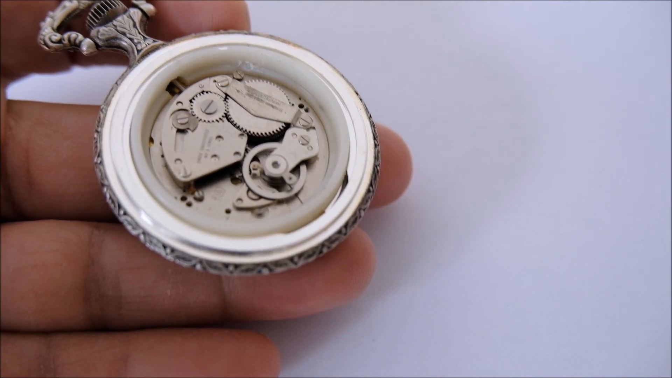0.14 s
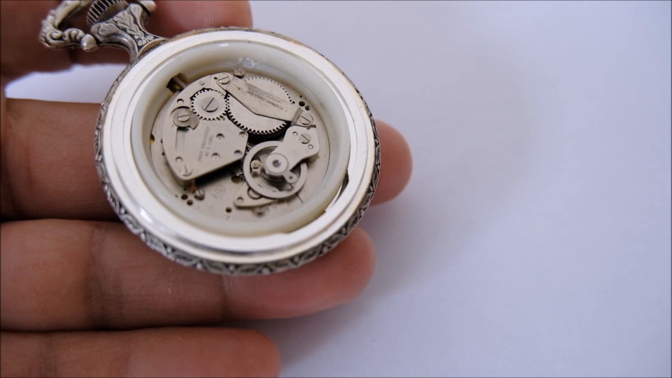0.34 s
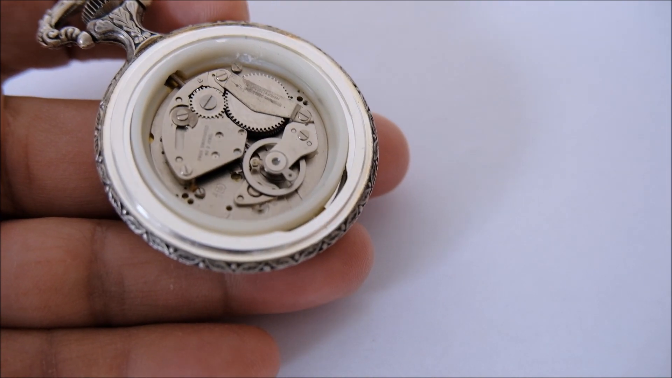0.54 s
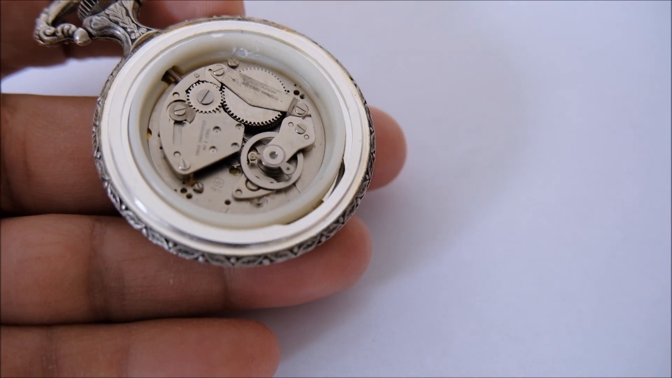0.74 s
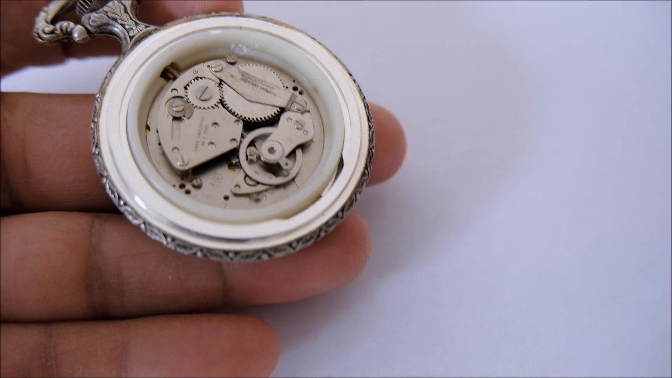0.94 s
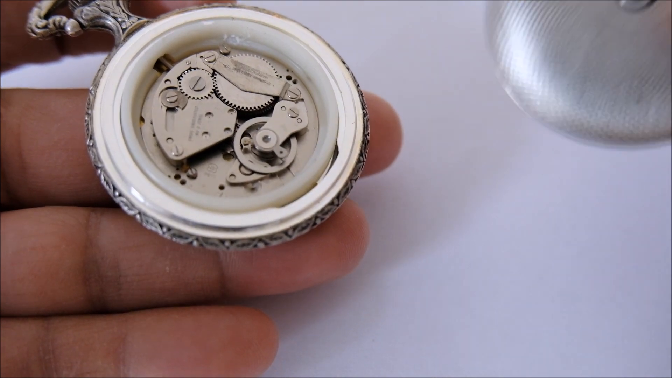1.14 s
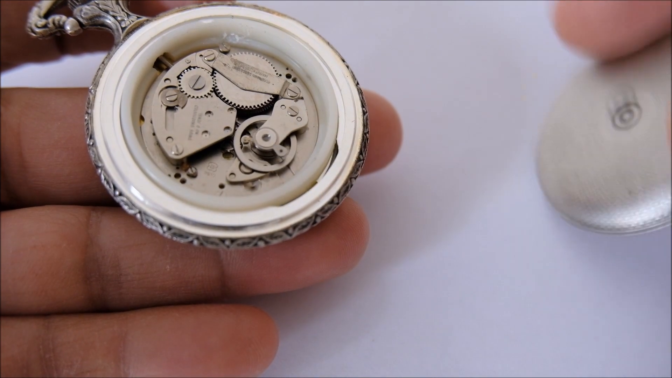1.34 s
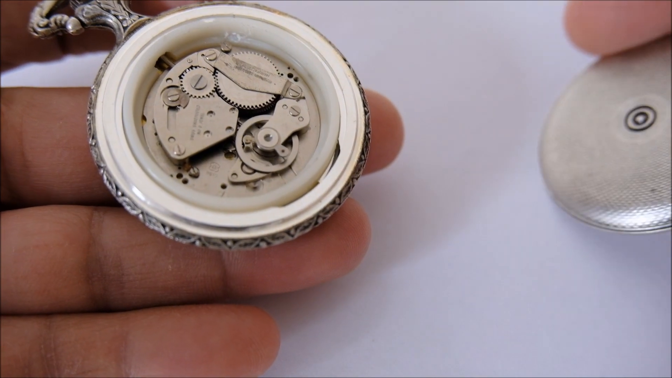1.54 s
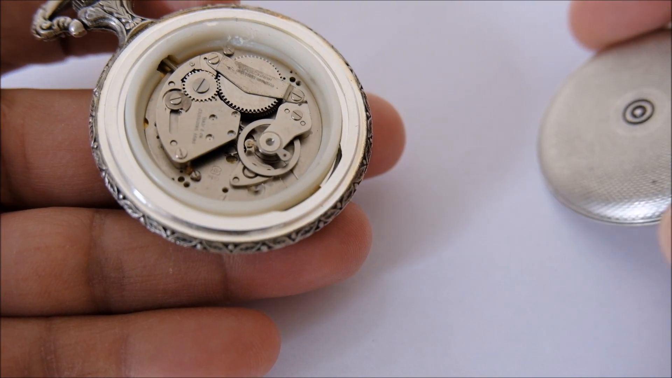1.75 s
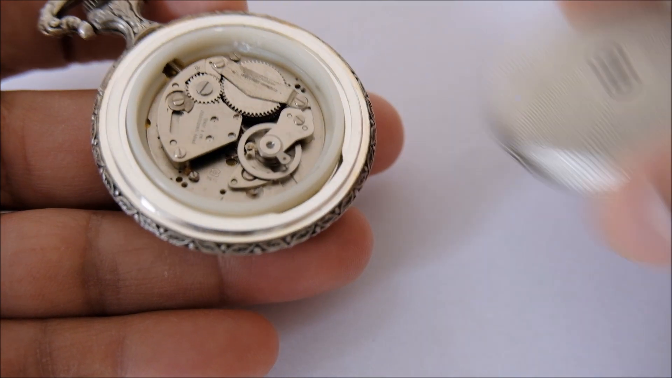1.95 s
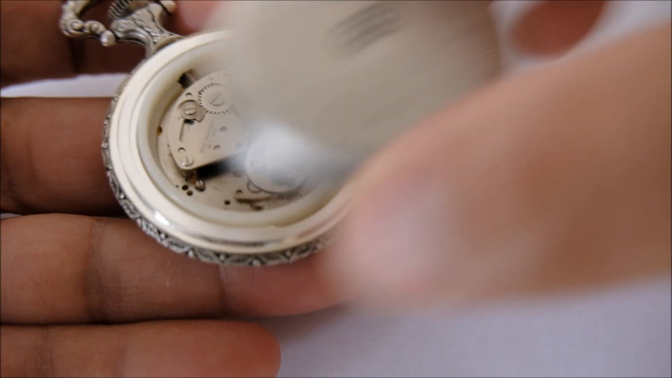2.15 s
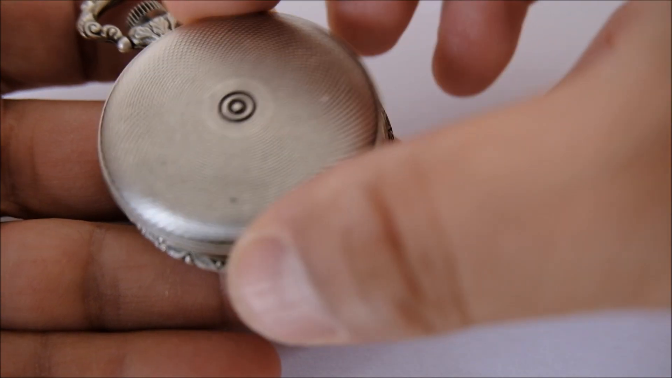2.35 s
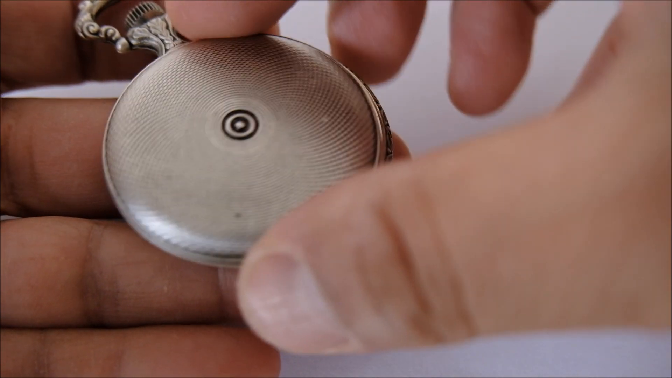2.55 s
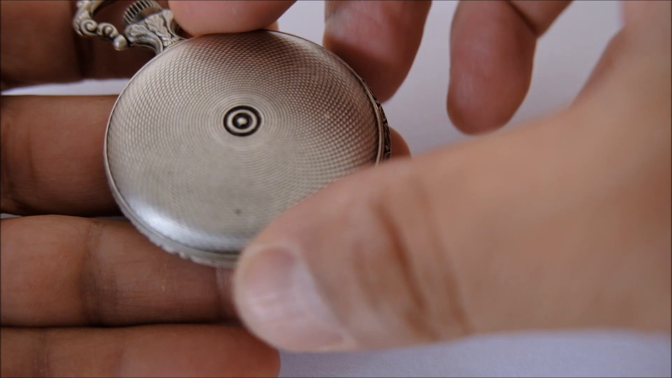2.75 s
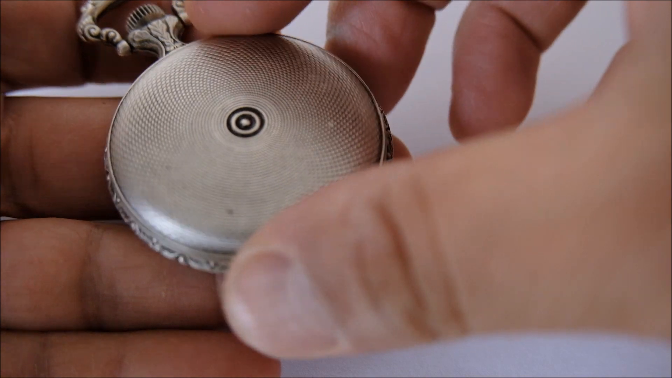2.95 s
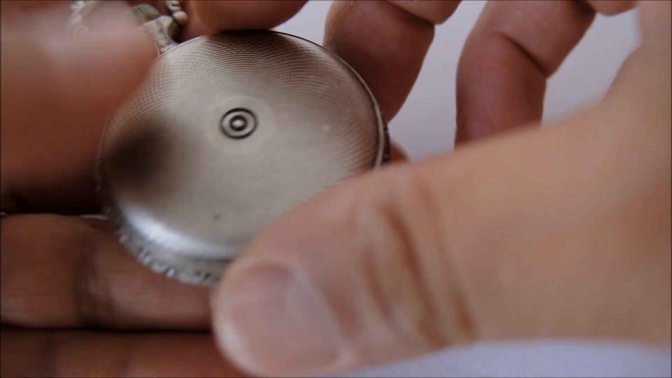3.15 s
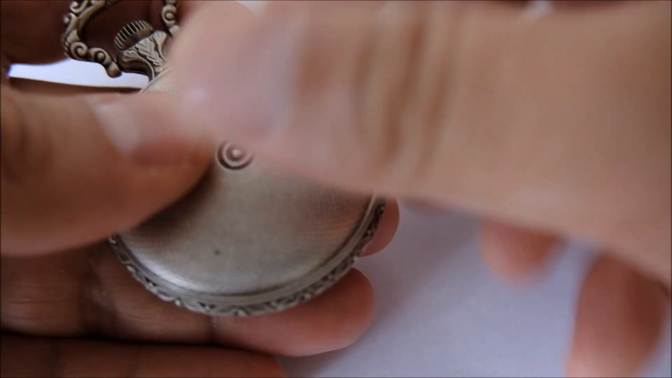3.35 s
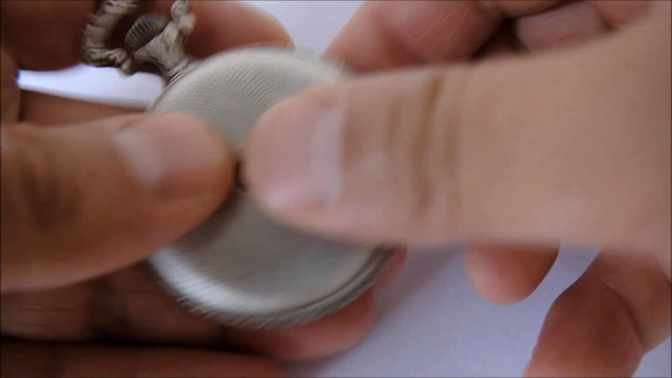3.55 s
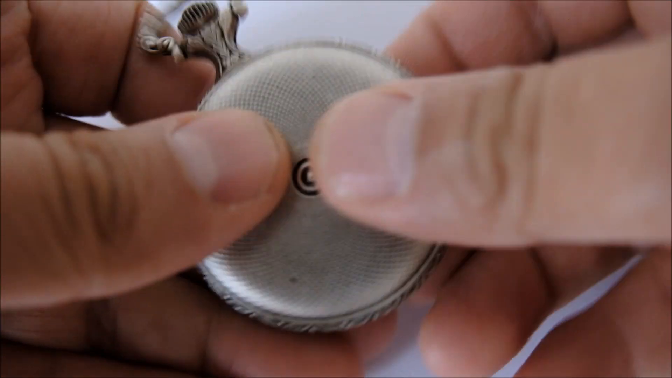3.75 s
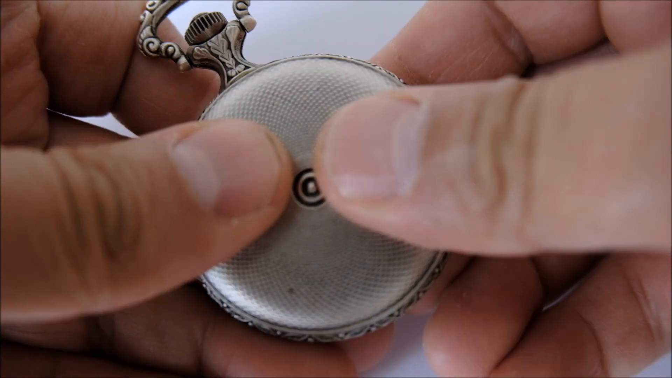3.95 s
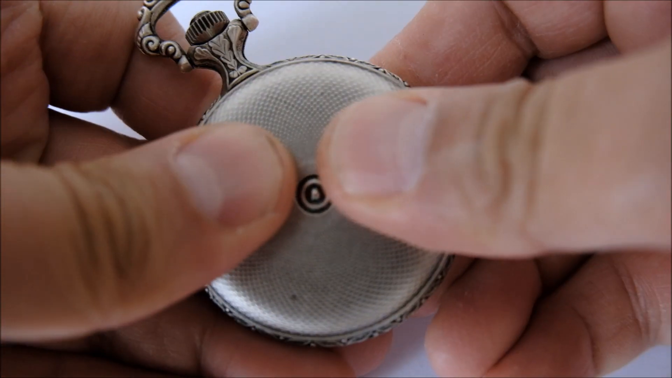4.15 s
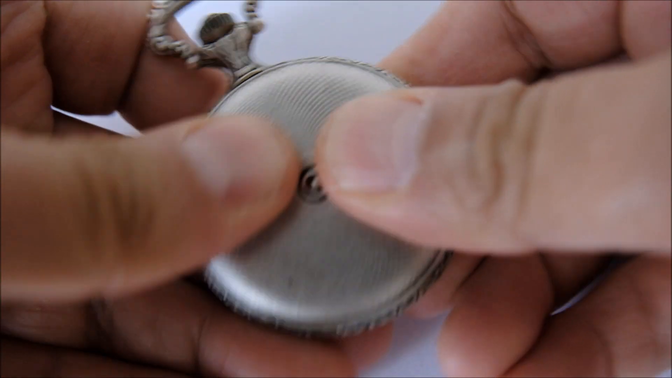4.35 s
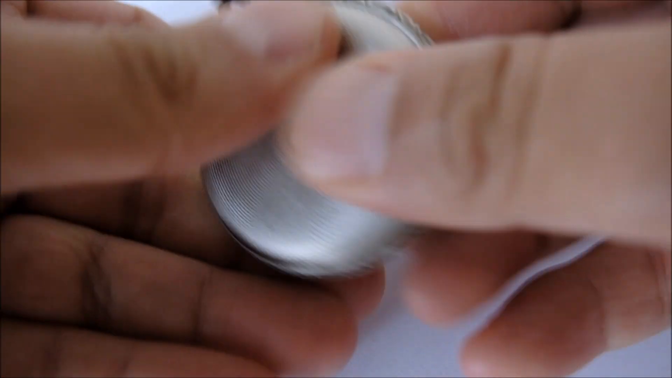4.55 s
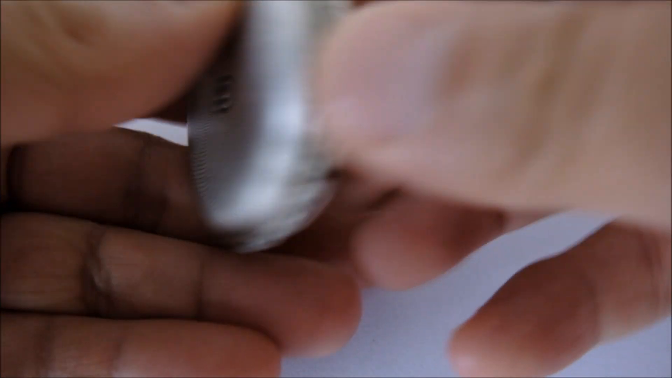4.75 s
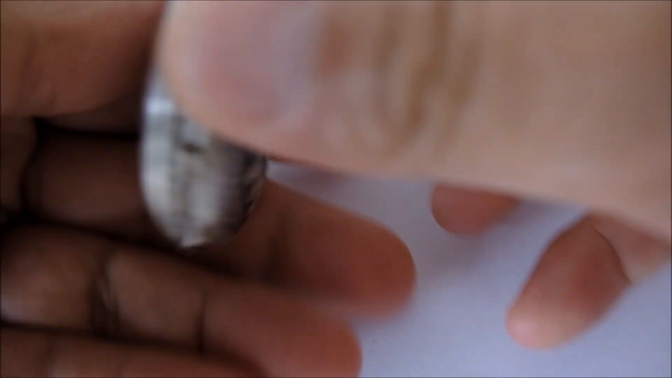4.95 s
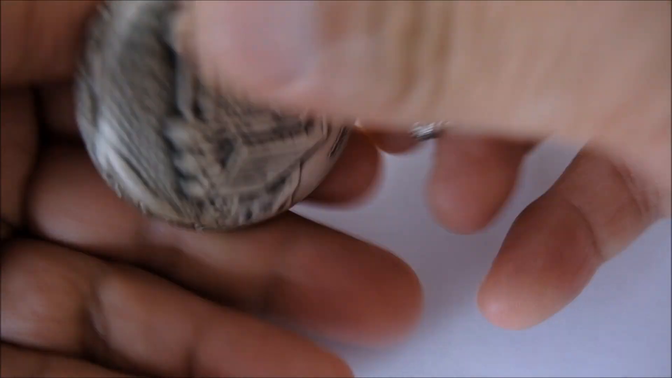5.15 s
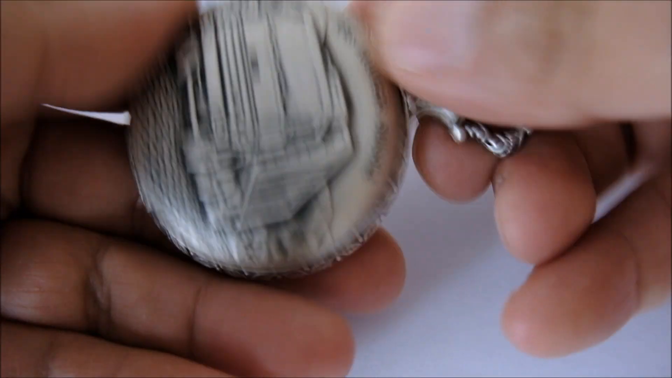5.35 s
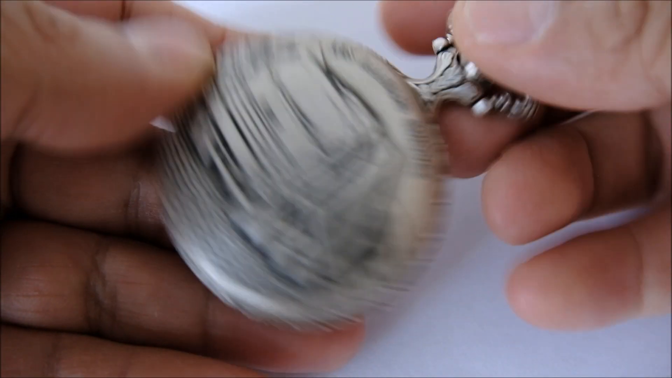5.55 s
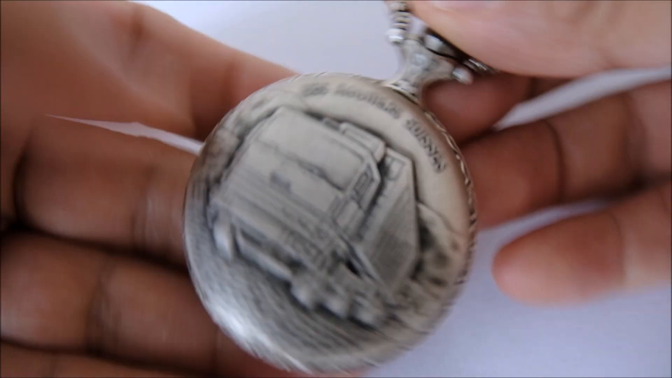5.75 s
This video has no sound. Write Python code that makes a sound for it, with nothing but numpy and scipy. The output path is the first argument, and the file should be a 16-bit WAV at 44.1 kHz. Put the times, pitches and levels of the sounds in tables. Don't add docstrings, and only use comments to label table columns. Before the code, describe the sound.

Close, small metallic ticks and skin rubs, a wooden knock, a bright lid clatter and one hard, dry snap over a faint machine drone.

```python
import sys
import numpy as np
from scipy import signal
from scipy.io import wavfile
from scipy.ndimage import uniform_filter1d

SR = 44100
rng = np.random.default_rng(int(sys.argv[2]) if len(sys.argv) > 2 else 0)


def unload_audio(sound):
    columns = np.transpose(np.atleast_2d(sound))
    steps = np.round(np.clip(columns, -1, 1) * 32767)
    wavfile.write(sys.argv[1], SR, steps.astype(np.int16))


def boost_factor(decibels):
    exponent = np.asarray(decibels, float) / 20
    return 10 ** exponent


N = 255912


def evened(x):
    return x / np.sqrt(np.mean(x ** 2) + 1e-20)


def read(points, hz):
    f, value = np.transpose(points)
    return np.interp(np.log(hz + 1), np.log(f + 1), value)


def add(mix, start_s, sound, pan_db=0., lag_samples=1):
    for port, side in enumerate((1, -1)):
        part = mix[port, round(start_s * SR) + port * lag_samples:][:len(sound)]
        part += sound[:len(part)] * boost_factor(side * pan_db / 2)


def ring(modes, contact_ms, spread_db=0., free=1.):
    t = np.arange(4500) / SR
    place_db = spread_db * rng.standard_normal(len(modes))
    tones = np.zeros(len(t))
    for (hz, db, t60_s), extra_db in zip(modes, place_db):
        fall_db = 60 * t / (t60_s * free)
        tones += boost_factor(db + extra_db - fall_db) * np.sin(2 * np.pi * hz * t)
    return tones * (1 - np.exp(-1000 * t / contact_ms))


def noise(level_db, same, size, patchy_db):
    frames, hz = 4 * N // size + 5, np.fft.rfftfreq(size, 1 / SR)
    a, b, c, d, patch = rng.standard_normal((frames, len(hz), 5)).T
    patch = uniform_filter1d(patch, size=12, axis=0)
    patch = evened(uniform_filter1d(patch, size=8, axis=1))
    likeness = np.clip(same(hz), -1, 1)[:, None]
    left = a + 1j * b
    right = likeness * left + np.sqrt(1 - likeness ** 2) * (c + 1j * d)
    z = np.array([left, right]) * boost_factor(level_db(hz)[:, None] + patchy_db * patch)
    return evened(signal.istft(z, nperseg=size, noverlap=3 * size // 4)[1][:, :N])


def strokes(rows, span_db=20.5):
    t = np.arange(0, N + 16, 16) / SR
    gain = np.zeros(len(t))
    for peak_s, db, swell_s, fade_s in rows:
        away = np.maximum((peak_s - t) / swell_s, (t - peak_s) / fade_s)
        gain += boost_factor(db - span_db * away)
    return np.interp(np.arange(N) / SR, t, gain)


def tick(db, hz, ms):
    t = np.arange(2400) / SR
    burst = rng.standard_normal(len(t)) * np.exp(-1000 * t / ms)
    peak = signal.iirpeak(hz, 1.8, fs=SR)
    tone = signal.lfilter(*peak, signal.lfilter(*peak, burst))
    band_hz = [0.5 * hz, min(2.2 * hz, SR / 2.5)]
    edge = signal.lfilter(*signal.butter(2, band_hz, "band", fs=SR), burst)
    sound = tone + 0.094 * edge
    return boost_factor(db) * sound / abs(sound).max()


# frequency in Hz, level in dB, t60 in s.
SHUT = [(281, -11, 0.0045), (633, -3, 0.0039), (1214, .3, 0.0036), (1600, -8, 0.004)]
# frequency in Hz, level in dB, t60 in s.
LIP = [(2300, -22, 0.006), (3250, -10, 0.0035), (4000, -5, .0032), (4600, -15, 0.007), (5250, -19, 0.007),
       (6200, -19, 0.004), (7800, -14, 0.003), (9350, -19, 0.004), (11200, -27, .003)]
CLIMB_S, CLIMB_DB = 4.0974, 2.2
RELEASE_S, RELEASE_DB = 4.0979, -.6


def snap():
    out = np.zeros((2, N))
    add(out, CLIMB_S, boost_factor(CLIMB_DB) * ring(SHUT, .35), .3)
    release = ring(SHUT, .15) + boost_factor(3.5) * ring(LIP, .06)
    add(out, RELEASE_S, -boost_factor(RELEASE_DB) * release, .3)
    return out


# frequency in Hz, level in dB, t60 in s.
LID = [(3000, -11.5, .04), (2922, -0.5, 0.056), (6180, -5.5, 0.05), (6296, 0.7, 0.069), (9800, -2.5, 0.05),
       (11460, -29.5, .03), (12600, -23, 0.0305), (14780, -24, 0.049)]
# frequency in Hz, level in dB, t60 in s.
CASE = [(1243, -6, 0.011), (1446, 4.5, 0.011), (2320, -13, .006), (3700, -3, 0.006), (4370, 1.1, 0.004),
        (5100, -5, 0.0038), (5510, -12.5, .003), (7830, -19, 0.00316)]
# start in s, crack in dB, lid ring in dB, hollow knock in dB, freedom to ring 0-1.
CLATTER = [(0.897, -57, -45, -70, 0.18), (2.4652, -9.5, -21.5, -17.5, 0.8), (2.4694, -16, -22, -25.5, 0.7),
           (2.4864, -11, -19, -21.5, 0.27), (2.4907, -14, -22, -29.5, 0.5), (2.4933, -16, -26.5, -37, 0.6),
           (2.5024, -8, -19, -13, 0.54), (2.5092, -6, -29.5, -28.5, 0.34), (2.5131, -17.5, -37, -22, .35),
           (2.5297, -44, -65, -44, .5), (2.539, -46.5, -56, -32, .3)]
# frequency in Hz, level in dB, t60 in s.
RIM = [(1700, -.6, 0.013), (1860, 2.5, 0.045), (2250, -7, 0.021), (3150, -8, .012), (3760, -11, 0.019),
       (6250, -13, 0.047), (8700, -20, 0.0055)]
# start in s, level in dB, freedom to ring 0-1.
NUDGES = [
    (2.663, -41, 0.22),
    (2.9614, -32, 0.98),
]
# peak in s, level in dB, swell in s, fade in s.
LID_RUBS = [(.735, -72, .09, .02), (.8, -82, .03, .006), (1.096, -76, .06, .04), (1.184, -68, 0.086, 0.036),
            (1.812, -79, 0.041, .14)]


def lid():
    out = np.zeros((2, N))
    for k, (start_s, crack_db, ring_db, hollow_db, free) in enumerate(CLATTER):
        pan_db = (-1) ** (k + 1)
        add(out, start_s, boost_factor(crack_db) * ring(CASE[2:], 0.17, 2.5), pan_db)
        add(out, start_s, boost_factor(hollow_db) * ring(CASE[:2], 0.38, 1.8), pan_db)
        add(out, start_s, boost_factor(ring_db) * ring(LID, 0.29, 1.0, free), pan_db, lag_samples=0)
    for start_s, db, free in NUDGES:
        add(out, start_s, boost_factor(db) * ring(RIM, 0.16, 2.4, free), .4)
    singing = evened(signal.oaconvolve(rng.standard_normal(N), ring(LID, .1))[:N])
    port_gain = boost_factor(np.array([[-2.1], [2.2]]))
    return out + boost_factor(5.0) * strokes(LID_RUBS) * singing * port_gain


# start in s, level in dB, lid edge pitch in Hz, edge level in dB.
KNOCK = [
    (1.3383, -14, 1700, -5),
    (1.3402, -14, 1120, -6.5),
    (1.3420, -19, 1100, -10.5),
]
# frequency in Hz, level in dB, t60 in s.
TABLE = [(294, -12, 0.088), (460, 0.5, 0.012), (575, -8, 0.014), (890, -6, 0.017), (1330, .1, 0.008),
         (2380, -7, 0.017), (2780, -16, 0.013), (5200, -46, 0.0053), (6050, -22.5, 0.012)]


def knock():
    out = np.zeros((2, N))
    for start_s, db, edge_hz, edge_db in KNOCK:
        ping = ring([(edge_hz, edge_db, .012)], 0.13)
        add(out, start_s, boost_factor(db) * ring(TABLE, 0.77) + ping, .3)
    return signal.lfilter(*signal.butter(2, 220, "high", fs=SR), out)


# start in s, peak in dB, centre in Hz, pan in dB.
TICKS = [(0.038, -55, 5000, 11), (0.0988, -51, 5100, 8), (.185, -55, 3940, 1), (0.806, -40.5, 3200, 3),
         (.8464, -52, 7550, 7), (0.9402, -48, 12000, 4), (.9406, -39.5, 4500, 8), (1.0377, -53, 4840, 3),
         (1.095, -43, 4530, 9), (1.334, -45, 4970, -11), (1.3757, -42, 4760, 4), (2.2164, -55, 4980, -2),
         (2.812, -44.5, 2880, .1), (3.0846, -47.5, 8000, 9), (3.1335, -41.5, 10500, 2.5),
         (4.0374, -54, 5060, 1.2), (4.044, -50.5, 5960, 4), (4.543, -58, 8700, 1.2), (4.735, -58, 8700, 0),
         (4.842, -51, 5000, 4), (5.038, -57, 6160, 7), (5.065, -41, 8000, -1.2), (5.338, -55, 8500, 1.2),
         (5.545, -57, 8500, 2), (5.7304, -57, 5950, -.6)]
# start in s, peak in dB, duller part in Hz, brighter part in Hz, pan in dB.
TAPS = [(0.9401, -36, 1510, 7250, 8), (0.9558, -35, 1100, 2590, 2.2), (1.088, -37, 1090, 4830, 5),
        (2.6638, -31, 2250, 3700, 2), (2.9626, -35.5, 3350, 5400, -0.8), (3.0844, -36, 910, 3000, 3),
        (3.1324, -42, 2650, 6000, 7)]
# start in s, peak in dB, centre in Hz, length in ms.
SLIPS = [(.6414, -39.5, 1080, 5.5), (.6835, -53, 5200, 4.6), (.6914, -51, 9000, 5.4), (.957, -45, 5500, 6),
         (1.174, -46, 2600, 9), (2.0494, -55, 5000, 8), (2.745, -49, 2000, 23), (2.781, -42.5, 1410, 32),
         (2.9523, -36, 1600, 5.5), (3.1755, -41, 1096, 3.9), (4.43, -52, 2500, 13), (4.59, -51.5, 2920, 19),
         (5.075, -58, 4500, 18), (5.191, -42.5, 2500, 15), (5.205, -43.5, 2400, 3.8), (5.49, -58, 5500, 18),
         (5.53, -62, 5500, 18)]
TICK_MS, TAP_MS, TAP_BRIGHT_DB, SLIP_PAN_DB = 1.4, 2, -4, 1


def ticks():
    out = np.zeros((2, N))
    for start_s, db, hz, pan_db in TICKS:
        add(out, start_s, tick(db, hz, TICK_MS), pan_db)
    for start_s, db, dull_hz, bright_hz, pan_db in TAPS:
        dull = tick(db, dull_hz, TAP_MS)
        bright = tick(db + TAP_BRIGHT_DB, bright_hz, TAP_MS)
        add(out, start_s, dull + bright, pan_db)
    for start_s, db, hz, ms in SLIPS:
        add(out, start_s, tick(db, hz, ms), SLIP_PAN_DB)
    return out


# frequency in Hz, density in dB per Hz.
SKIN = [(500, -39), (1200, -10), (2500, -1.5), (4500, -9.5), (7000, -17.5), (11000, -24), (15800, -36)]
# peak in s, level in dB, swell in s, fade in s.
RUBS = [(.036, -67.5, 0.035, 0.28), (.186, -58, 0.0086, .04), (.69, -74, .03, .03), (.74, -74, .2, 0.017),
        (.804, -74, .05, .05), (.848, -61.5, .013, .016), (.97, -64, 0.011, .06), (1.094, -67, .035, .05),
        (1.172, -69, .12, 0.16), (1.44, -71, .1, .1), (1.814, -71, 0.037, 0.13), (2.046, -71.5, .03, .3),
        (2.214, -80, .02, .16), (2.7, -76, .05, .04), (2.85, -74.5, 0.16, .02), (2.94, -73, .13, .006),
        (3.2, -78, .01, 0.22), (3.62, -59, 0.14, 0.096), (3.74, -65.5, .1, .12), (3.842, -75, .03, .1),
        (4.04, -67.5, .01, .1), (4.464, -65.5, 0.25, 0.18), (4.604, -63, 0.037, 0.13),
        (4.958, -66.5, 0.19, 0.21), (5.066, -62.5, 0.009, 0.018), (5.218, -64, 0.25, 0.035),
        (5.33, -68.5, 0.089, 0.046), (5.54, -70, .28, .07), (5.758, -60.5, 0.091, .1)]


def skin():
    slips = boost_factor(2.2 * evened(uniform_filter1d(rng.standard_normal(N), size=180)))
    hiss = noise(lambda hz: read(SKIN, hz), lambda hz: 0.53 + 0 * hz, size=256, patchy_db=1.0)
    return boost_factor(6.0) * strokes(RUBS) * hiss * evened(slips)


def desk(x, echo_db=-17.0, fall_db_per_ms=2.0):
    ms = rng.uniform(.8, 10, (2, 12))
    sign = rng.choice([-1., 1.], (2, 12))
    taps = np.zeros((2, 512))
    np.put_along_axis(taps, (ms * SR / 1000).astype(int), sign * boost_factor(echo_db - fall_db_per_ms * ms), 1)
    return x + signal.oaconvolve(x, taps, axes=1)[:, :N]


# frequency in Hz, t60 in s.
ROOM = [(150, 0.43), (500, 0.19), (1200, 0.27), (2500, 0.25), (5000, 0.28), (10000, 0.22), (15000, 0.25)]
# frequency in Hz, left-right likeness 0-1.
ROOM_SAME = [(200, 1), (1000, 0.88), (3000, 0.18), (10000, 0.1)]


def walls(colour, first_ms, build_ms, length):
    taps = np.zeros((2, SR // 2))
    at = np.arange(0, SR // 2 - 10, 10) + rng.integers(0, 10, (2, SR // 20 - 1))
    np.put_along_axis(taps, at, rng.choice([-1., 1.], at.shape), 1)
    hz, t, z = signal.stft(taps, SR, nperseg=512)
    same = np.clip(read(ROOM_SAME, hz), 0, 1)[:, None]
    z[1] = same * z[0] + np.sqrt(1 - same ** 2) * z[1]
    t60_s = length * read(ROOM, hz)[:, None]
    z *= boost_factor(read(colour, hz)[:, None] - 60 * t / t60_s)
    tail = signal.istft(z, SR, nperseg=512)[1]
    ms = 1000 * np.arange(tail.shape[1]) / SR
    tail = tail * (1 - np.exp(-np.maximum(ms - first_ms, 0) / build_ms)) ** 2
    return tail / np.linalg.norm(tail[0])


def answer(start_s, db, tail):
    out = np.zeros((2, N))
    out[:, round(start_s * SR):][:, :tail.shape[1]] = boost_factor(db) * tail
    return out


# frequency in Hz, level in dB.
ROOM_COLOUR = [(60, -43.5), (130, -12), (300, -6.5), (1200, 9.5), (3000, -0.5), (6000, -8.5), (12000, 5.5)]
# frequency in Hz, density in dB per Hz.
KNOCK_SENT = [(71, -58), (120, -25), (231, -24), (310, 6), (568, -14), (856, -1), (1270, -0.5),
              (1590, -11.5), (2000, -5.5), (2170, -8), (6000, -69), (7800, -78), (13200, -120)]
# frequency in Hz, density in dB per Hz.
SNAP_SENT = [(71, -41.5), (120, -27), (301, -10), (544, -4), (640, -11.5), (801, -8.5), (1280, -4.5),
             (2270, -9.5), (2410, -8.5), (3280, -20.5), (5030, -18), (5800, -24.5), (15800, -43.5)]
KNOCK_SENT_DB, SNAP_SENT_DB = 9, 9


def room(small, metal):
    sent = (boost_factor(-8.5) * small + boost_factor(-13.5) * metal).mean(0)[None]
    echo = signal.oaconvolve(sent, walls(ROOM_COLOUR, 6.84, 3.5, 0.87), axes=1)[:, :N]
    echo += answer(KNOCK[0][0], KNOCK_SENT_DB, walls(KNOCK_SENT, 0.96, 0.81, 0.83))
    echo += answer(CLIMB_S, SNAP_SENT_DB, walls(SNAP_SENT, 2.4, 16.5, 0.93))
    return echo


# frequency in Hz, density in dB per Hz.
DRONE = [(22, -18.5), (48, -6), (70, -15.5), (150, -3), (250, -6), (400, -10.5), (720, -14), (1000, -12.5),
         (1350, -14.5), (1480, -22.5), (2500, -24), (3900, -27.5), (4450, -34.5), (15800, -47)]
# centre in Hz, width in Hz, rise over the drone in dB.
HUMPS = [(100, 15, 12), (201.6, 19.7, 9), (294.4, 18, 5.1), (574, 76, 7.2), (1091.5, 47, 15),
         (1246, 95, 9.56), (1840, 74, 3), (3220, 290, 6), (3700, 115, 10), (9150, 330, 2.2)]
# frequency in Hz, left-right likeness -1 to 1.
SAME = [(60, 0.0017), (120, 0.6), (240, 0.68), (480, 0.45), (950, 0.8), (1890, 0.46), (3770, 0.024),
        (7520, -0.055), (15000, -0.33)]
DRONE_DB = -49


def drone():
    def colour(hz):
        humps_db = sum(db * np.exp(-2 * ((hz - f) / width) ** 2) for f, width, db in HUMPS)
        return read(DRONE, hz) + humps_db
    port_gain = boost_factor(np.array([[.45], [-.45]]))
    return boost_factor(DRONE_DB) * noise(colour, lambda hz: read(SAME, hz), size=1024, patchy_db=1.08) * port_gain


def hum(hz=100, rms_db=-63.5):
    return np.sqrt(2) * boost_factor(rms_db) * np.sin(2 * np.pi * hz * np.arange(N) / SR)


def scene():
    small, metal = ticks(), lid()
    near = desk(small + metal + knock() + snap())
    return near + skin() + room(small, metal) + drone() + hum()


def roll_off(x):
    return signal.sosfilt(signal.butter(12, 15930, fs=SR, output="sos"), x)


def record(dry):
    miked = signal.lfilter(*signal.butter(1, 35, "high", fs=SR), dry)
    held = np.clip(miked, -.97, .97)
    edge = signal.firwin(255, 15900, window=("kaiser", 9), fs=SR)
    finished = signal.oaconvolve(held, edge[None], "same")
    return roll_off(finished)


dry = scene()
out = record(dry)
unload_audio(out)
```